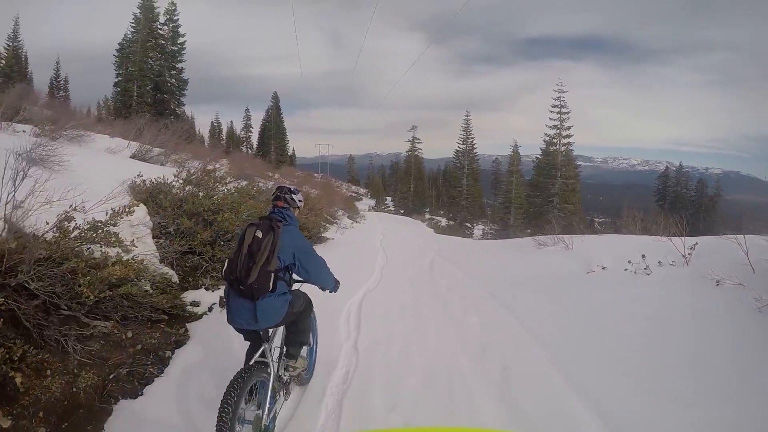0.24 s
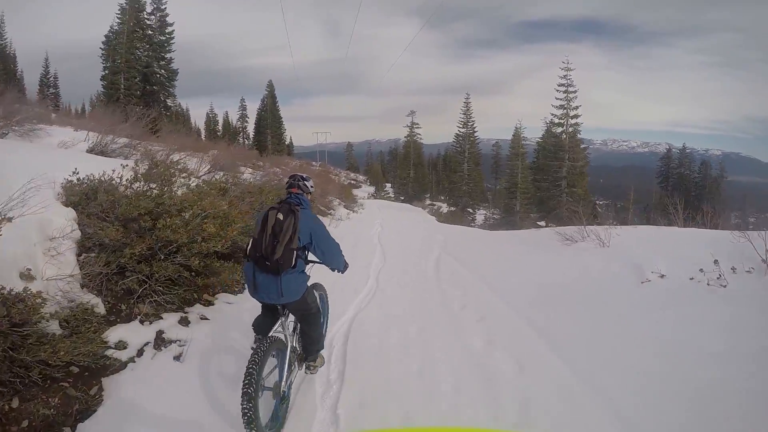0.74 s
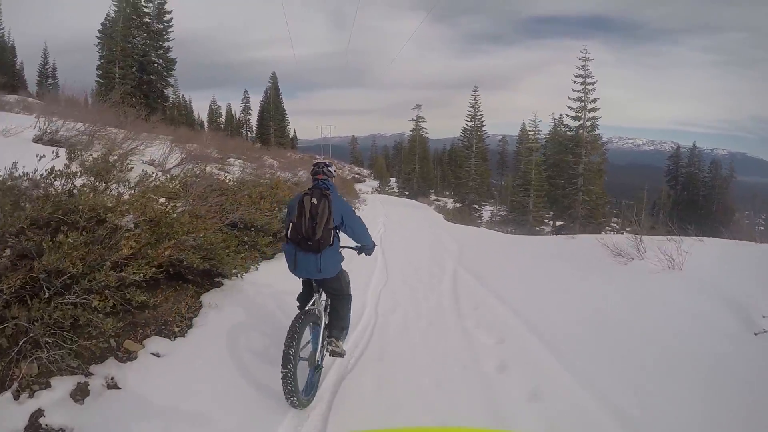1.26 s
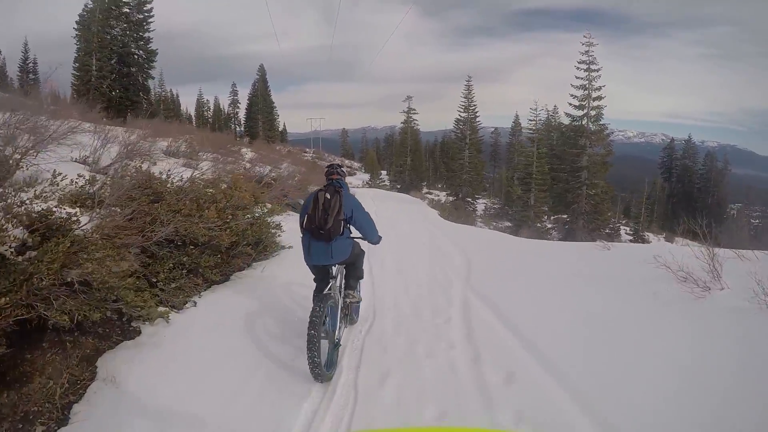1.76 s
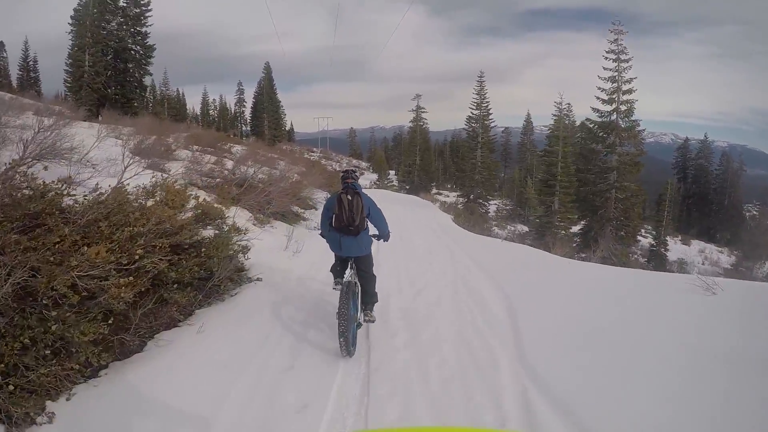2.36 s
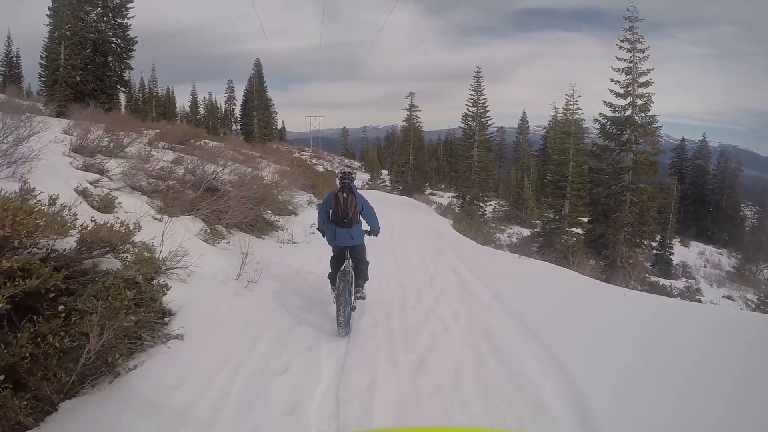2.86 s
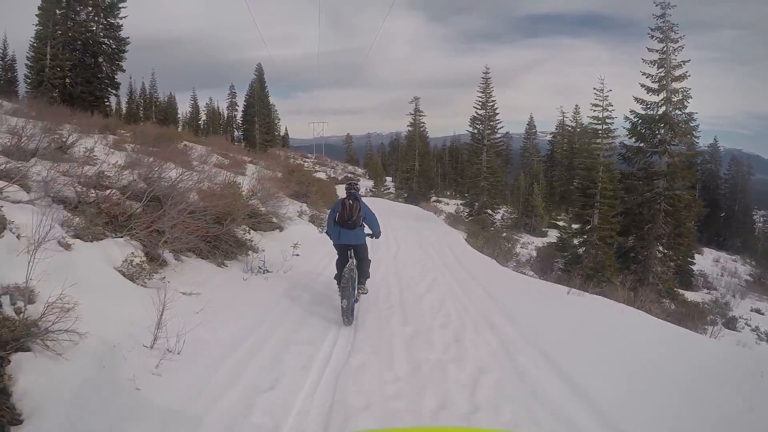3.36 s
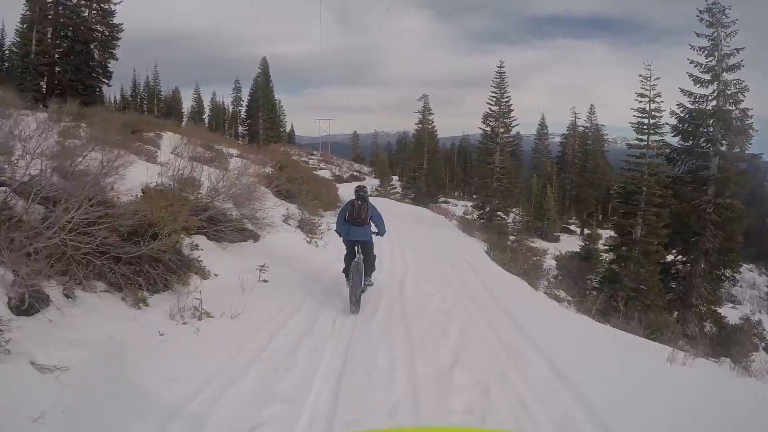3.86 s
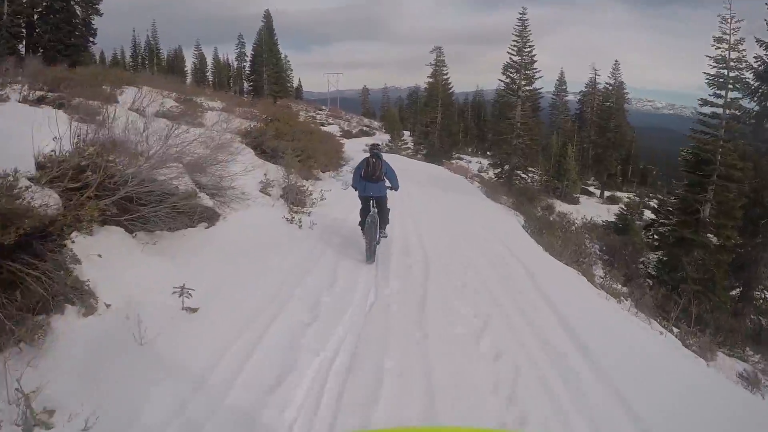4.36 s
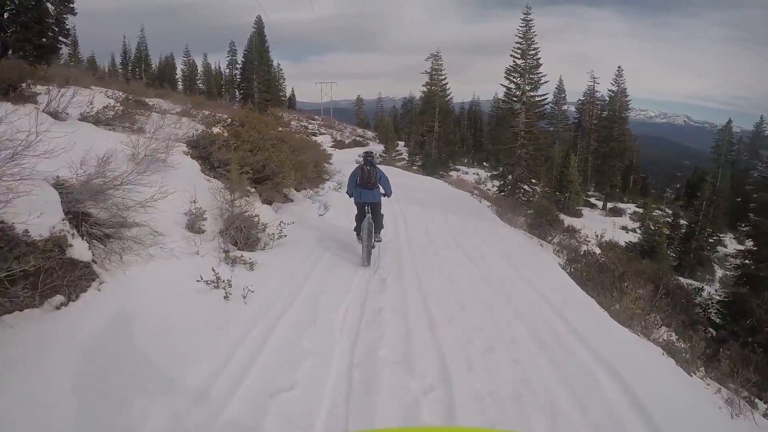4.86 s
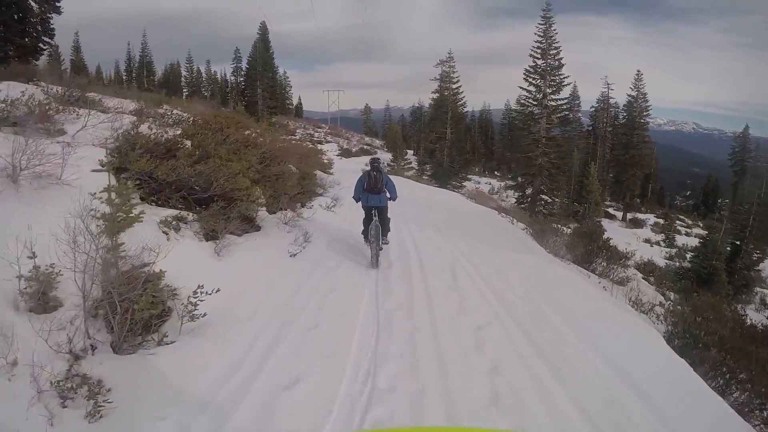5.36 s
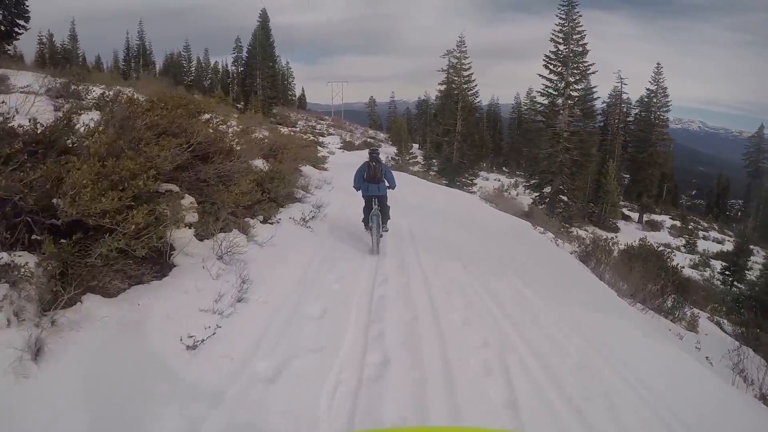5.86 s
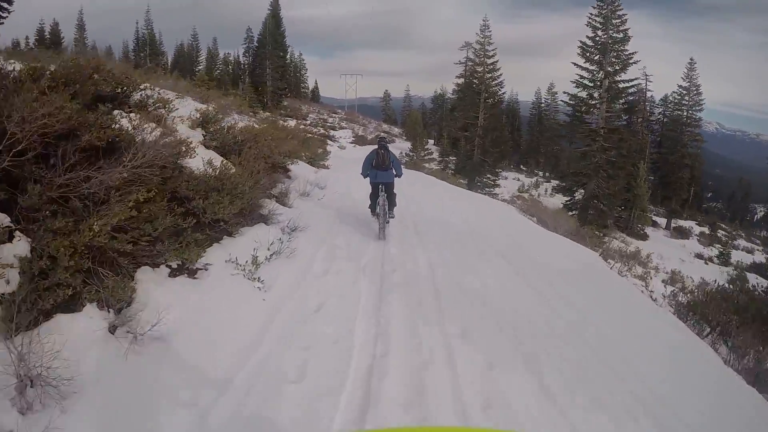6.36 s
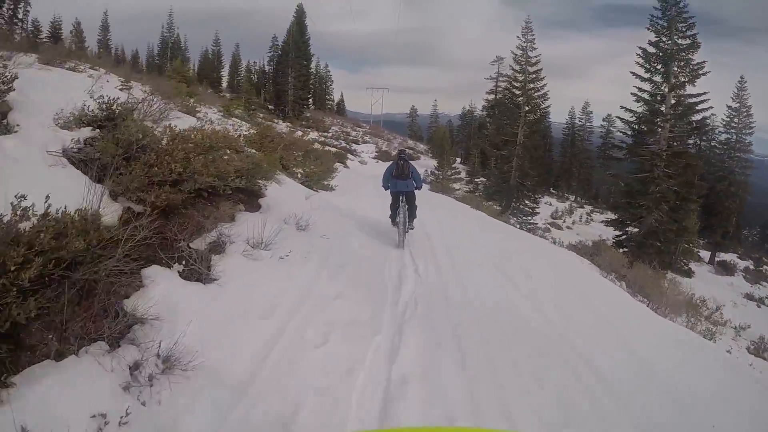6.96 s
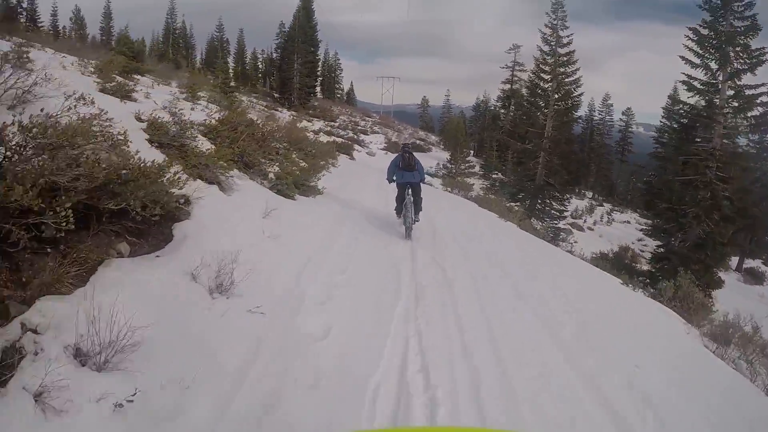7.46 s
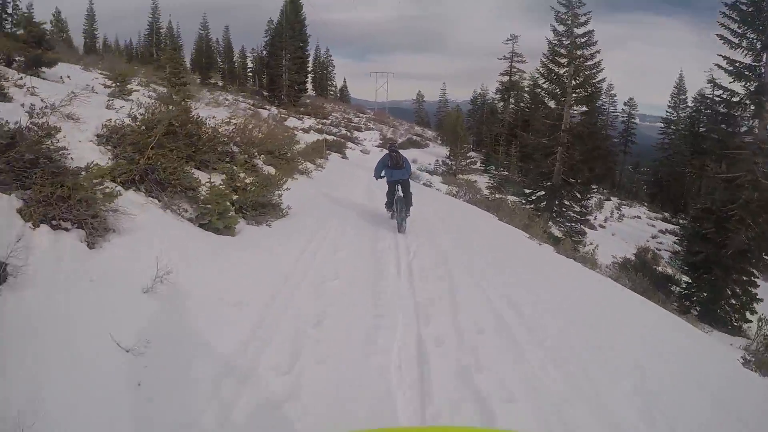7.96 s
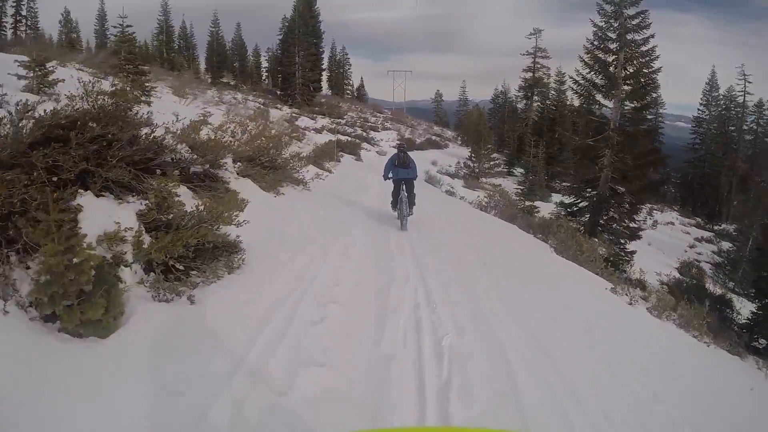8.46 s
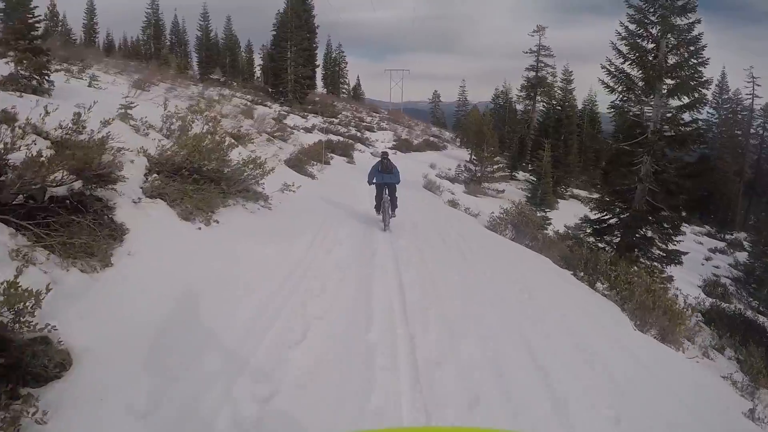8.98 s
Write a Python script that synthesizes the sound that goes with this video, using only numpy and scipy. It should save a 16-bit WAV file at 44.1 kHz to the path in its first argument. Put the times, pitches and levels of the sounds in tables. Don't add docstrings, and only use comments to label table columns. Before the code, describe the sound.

Fat bike tyres crunch and thump over packed snow while low wind buffeting swells into heavy rumble and a plastic camera case knocks and rattles.

```python
import sys
import numpy as np
from scipy import signal
from scipy.fft import rfft, irfft, next_fast_len
from scipy.io import wavfile
from scipy.ndimage import uniform_filter1d

SR = 44100
rng = np.random.default_rng(int(sys.argv[2]) if len(sys.argv) > 2 else 0)


def ratio(d):
    e = np.asarray(d, float) / 20
    return 10 ** e


def pcm_store(signal):
    levels = np.round(np.clip(np.atleast_2d(signal), -1, 1) * 32767)
    wavfile.write(sys.argv[1], SR, levels.astype(np.int16).T)


N = 406602

# (time [s], level [dB])
WIND_PUSH = [(0, -53), (.15, -36.5), (.72, -52.5), (1.0, -44.5), (2.36, -42), (2.5, -40), (2.535, -26.5),
             (3.31, -31.5), (3.9, -18), (4.3, -21), (5.0, -16.5), (6.3, -16.5), (6.8, -19.5), (7.5, -17),
             (8.1, -19), (9.22, -20)]
# (time [s], buffet change [dB], flutter change [dB])
GUST_SWELLS = [(1.2, -11, -10), (1.95, 1, -15), (2.53, -7, -11), (2.63, 8.5, -12), (2.85, 3.5, -39),
               (3.45, -3, 3), (4.39, -9, -3), (4.46, 11, 4), (4.7, 1, -1.5), (5.0, -4.5, -4),
               (5.16, -0.5, -1), (5.28, 2, 2), (5.35, -2, -8.5), (5.44, 3.5, 2.5), (5.53, -5.5, -10.5),
               (5.75, 6, 0.5), (5.86, -3, -5), (6.09, -2, 1.5), (6.45, -5.5, -2.5), (6.8, -13.5, 0),
               (7.7, 6, 1), (7.87, -8.5, -4.5), (7.95, 7, 5.5), (8.09, -5, -1.5), (8.27, 2, -0.5),
               (8.63, 3.5, 1), (8.76, -5.5, -5.5), (8.91, 6, -4.5), (9.14, -4.5, 0.5)]
# (frequency [Hz], density [dB per Hz])
BUFFET_COLOUR = [(8, -41.5), (14, -10.5), (30, 7), (60, 3), (90, -6.5), (130, -19), (200, -56.5)]
# (frequency [Hz], density [dB per Hz])
FLUTTER_COLOUR = [(50, -29.5), (85, -1.5), (140, -4), (200, -8), (300, -17.5), (500, -56.5)]
# (time [s], peak level [dB], pitch [Hz])
EDDY_SLAPS = [(3.555, -12, 69), (3.764, -15, 88.8), (3.85, -15, 104), (3.899, -16, 85.5),
              (3.974, -10, 99.6), (4.136, -14, 78.1), (4.456, -40, 258), (4.456, -7.5, 113),
              (4.555, -21, 61.9), (4.718, -6, 62.4), (5.063, -14, 78.1), (5.117, -11, 87),
              (5.237, -10, 62.4), (5.327, -9, 88.8), (5.432, -17, 64.6), (5.646, -12.5, 61.9),
              (5.923, -11, 79), (6.094, -10.5, 67), (6.264, -8.5, 86.1), (6.379, -15, 108),
              (6.696, -8, 99.6), (6.88, -15, 91.5), (6.948, -11.5, 127), (7.037, -12, 107),
              (7.142, -4.5, 60.4), (7.177, -6, 129), (7.339, -14, 79), (7.584, -20, 88.8),
              (7.651, -16, 61.9), (7.915, -10, 68.6), (8.202, -12.5, 61.9), (8.269, -12, 78.1),
              (8.492, -12, 96.9), (8.807, -8.5, 78.1), (8.881, -13, 91.5), (9.037, -16, 76)]

# (time [s], crunch level [dB], dryness of the snow [dB])
TYRE_BITE = [(0.0, -57.5, -7), (0.38, -50.5, -1), (0.67, -57.5, -5), (1.08, -54, -2), (1.59, -51.5, -4),
             (1.98, -54, -3), (3.29, -54, -2.5), (4.11, -45.5, -3.5), (4.54, -48, -2), (5.24, -42.5, -0.5),
             (5.55, -49.5, -3.5), (6.32, -48.5, -1.5), (6.75, -45.5, -10), (7.27, -42.5, 4),
             (8.14, -51.5, -4), (8.7, -46.5, -3), (8.88, -53, -2.5), (9.22, -50.5, -7)]
# (time [s], change [dB])
CRUST_PATCHES = [(.45, 2.5), (.95, 5), (1.42, 2), (1.62, -2.5), (1.83, 1.5), (2.04, -5.5), (2.13, 0.5),
                 (2.27, -3), (2.38, 4.5), (2.52, -7.5), (3.4, 0.5), (3.7, -1.5), (4.39, -4.5), (4.65, -2),
                 (4.9, 1), (5.7, 0), (6.05, -0.5), (6.28, -3), (6.43, -0.5), (7.05, 0.5), (7.75, 2),
                 (8.2, -1.5), (8.55, 1)]
# (frequency [Hz], density [dB per Hz])
THUD_COLOUR = [(150, -23), (240, -2.5), (330, 0), (450, -2.5), (600, -18), (900, -26)]
# (frequency [Hz], density [dB per Hz])
CRUNCH_COLOUR = [(350, -24), (600, 1.5), (900, -1), (1200, -2), (1500, -6), (1800, -3.5), (2550, -10.5),
                 (3350, -18), (4100, -29.5), (5000, -29), (7000, -50), (9100, -57.5)]
# (frequency [Hz], level [dB], decay to -60 dB [s])
FRAME_MODES = [(158.7, -4, 0.14), (334, -9, 1)]
# (time [s], peak level [dB], pitch [Hz])
RUT_HITS = [(0.058, -30, 323), (0.123, -31, 365), (0.161, -24, 308), (0.225, -29, 325), (0.29, -38, 598),
            (0.29, -19.5, 320), (0.324, -18.5, 220), (0.365, -29, 460), (0.39, -23, 320), (0.457, -27, 331),
            (0.492, -28, 334), (0.516, -28, 237), (0.556, -28.5, 343), (0.715, -40, 420), (0.777, -30, 388),
            (0.825, -36, 320), (0.864, -31, 240), (0.928, -38, 444), (0.952, -31, 307), (1.01, -26.5, 430),
            (1.062, -28.5, 396), (1.215, -41, 326), (1.311, -43, 336), (1.344, -27, 315), (1.415, -25, 323),
            (1.525, -28, 320), (1.55, -23, 277), (1.685, -40, 347), (1.716, -33, 331), (1.754, -29.5, 420),
            (1.78, -26, 218), (1.897, -32, 312), (2.002, -43, 423), (2.084, -45, 404), (2.121, -29, 290),
            (2.205, -39, 350), (2.229, -30, 398), (2.255, -29, 323), (2.321, -36, 280), (2.359, -27, 320),
            (2.415, -35, 350), (2.466, -33, 340), (2.589, -32, 235), (2.624, -32, 326), (2.659, -33, 277),
            (2.698, -32, 288), (2.748, -28, 320), (2.784, -27, 337), (2.821, -26, 328), (2.959, -31, 202),
            (2.999, -40, 234), (3.044, -47, 202), (3.044, -29, 318), (3.097, -33, 374), (3.132, -32, 288),
            (3.199, -38, 202), (3.198, -27.5, 202), (3.306, -44, 355), (3.355, -38, 213),
            (3.41, -26.5, 334)]
# (time [s], peak level [dB], pitch [Hz])
RIDGE_JOLTS = [(0.16, -25, 91.5), (0.324, -29.5, 111), (0.518, -39, 156), (1.358, -33, 104),
               (1.561, -28.5, 77), (1.761, -43, 67.3), (2.136, -34, 130), (2.369, -28.5, 114),
               (3.039, -22, 94), (3.169, -20.5, 82), (3.409, -14, 74.4)]
# (time [s], peak level [dB], pitch [Hz])
CRUST_SNAPS = [(3.405, -31, 743), (3.539, -40, 563), (3.761, -35, 713), (3.857, -45, 587),
               (3.894, -32, 756), (4.121, -31, 630), (4.278, -40, 552), (4.337, -29, 762),
               (4.406, -36, 783), (4.453, -29, 996), (4.706, -34, 999), (4.792, -36, 915),
               (4.956, -37, 552), (4.993, -33, 689), (5.056, -37, 595), (5.171, -27, 856),
               (5.459, -27.5, 581), (5.664, -36, 560), (5.715, -30, 573), (5.95, -43, 552),
               (6.48, -36, 708), (6.546, -32, 608), (6.61, -32, 729), (6.705, -33, 751), (6.862, -32, 689),
               (6.893, -28, 915), (7.21, -30, 573), (7.465, -36, 716), (7.885, -45, 759), (8.264, -32, 589),
               (8.322, -37, 673), (8.368, -41, 630), (8.493, -36, 646), (8.74, -43, 764)]

# (time [s], peak level [dB], upper modes [dB rel], sharp edge [dB rel])
HARD_KNOCKS = [(0.1785, -25.5, -6.5, -24), (0.278, -25, -11, -32), (0.712, -27.5, -8.5, -29),
               (1.1455, -26, -9.5, -22), (1.7172, -28, -3, -51), (2.6408, -22.5, -15, -31),
               (2.8303, -22, -7.5, -20.5), (2.9355, -28, -8, -25), (3.4028, -28.5, -8, -27),
               (3.7506, -22.5, -9, -27), (3.7566, -19.5, -15, -27), (3.8926, -14, -16, -29.5),
               (4.1548, -18.5, -17, -49), (4.2812, -16.5, -21, -55), (4.336, -12, -22, -34),
               (4.3417, -18.5, -7.5, -29), (4.454, -12, -11, -34), (4.7056, -13, -12, -29),
               (5.0178, -15, -9, -23.5), (5.2989, -18.5, -11, -27.5), (5.662, -21.5, -10, -37),
               (5.85, -19.5, -9.5, -26), (6.517, -16.5, -9.5, -25.5), (6.835, -20, -10, -25),
               (7.2623, -18, -9.5, -30), (7.594, -19.5, -8.5, -35), (8.17, -25.5, -6, -23.5),
               (8.416, -15, -13, -23.5), (8.7163, -28.5, -4.5, -22), (8.8383, -19, -9.5, -26)]
# (time [s], peak level [dB], upper modes [dB
# rel], sharp edge [dB rel])
THIN_TICKS = [(.588, -33, -1, -17), (.72, -32, -0.5, -19), (1.224, -52, 7, 0), (1.5614, -37, 1.5, -19),
              (1.951, -46.5, 0.5, -25), (2.126, -41, -15, -29), (2.6813, -39, -4, -14),
              (4.2433, -53, 18, -1), (4.7014, -19.5, -8, -22), (5.306, -20, -8, -26),
              (7.2089, -25.5, 1.5, -15.5), (7.659, -34.5, 5, -7), (7.667, -34.5, 5, -1.5),
              (7.856, -39, -21, -42), (7.9312, -31.5, -5.5, -14), (8.408, -23, -4.5, -19.5)]
# (time [s], peak level [dB], upper modes [dB rel])
GENTLE_RATTLE = [(0.1348, -36, -21), (0.285, -31, -8.5), (0.325, -40, -16), (0.8235, -33.5, -11),
                 (0.8304, -33.5, -15), (1.023, -37, -6), (1.1344, -37.5, -2), (1.355, -32, -14),
                 (1.451, -33.5, -24), (1.5264, -41, -20), (1.7763, -35, -5.5), (2.08, -35, -8),
                 (2.1778, -36, -6.5), (2.184, -35, -23), (2.232, -46, -12), (2.3, -45, -6),
                 (2.361, -35.5, -23), (2.3838, -50, -21), (2.4013, -38, -25), (2.493, -34, -21),
                 (2.5376, -32.5, -7.5), (2.73, -36.5, -8), (2.9311, -32, -9), (3.019, -42, -4),
                 (3.0434, -39, -5), (3.0572, -29, -11), (3.106, -36, -11), (3.142, -38, -18),
                 (3.1476, -45, -23), (3.209, -36.5, -9.5), (3.301, -31, -8), (3.485, -36.5, -6.5),
                 (3.564, -37.5, -14)]
# (time [s], peak level [dB], upper modes [dB rel])
SPEED_RATTLE = [(3.8716, -24, -11), (4.0001, -28, -9.5), (4.121, -31, -17), (4.274, -27, -19),
                (4.31, -38, -8), (4.439, -42, -8), (4.5031, -28.5, -10), (4.5352, -27.5, -9),
                (4.687, -44, -2), (4.754, -31, -10), (4.807, -27.5, -7), (4.8568, -26, -16.5),
                (5.1936, -23, -12), (5.3388, -31, -11), (5.459, -29, -8), (6.003, -38, -9),
                (6.055, -38.5, -9), (6.606, -30, -11.5), (6.7056, -40, -20), (6.7995, -32, -20),
                (6.873, -28, -15), (6.9122, -30.5, -9.5), (7.0714, -28, -9), (7.3258, -23, -12.5),
                (7.4786, -24.5, -12), (7.58, -24, -10), (7.7234, -33, -17), (7.7562, -24.5, -11.5),
                (7.896, -27, -10), (7.991, -28.5, -17), (8.2403, -41, -8), (8.253, -29, -10),
                (8.296, -26.5, -8), (8.324, -38, -10), (8.494, -28.5, -18), (8.885, -33.5, -6)]
# (time [s], peak level [dB])
DEEP_ANSWERS = [(0.161, -41.5), (0.18, -33), (0.2793, -35), (0.3253, -40), (0.5896, -44), (0.7124, -44),
                (0.833, -40), (1.1468, -44), (1.4526, -39), (1.717, -27.5), (2.1844, -40.5), (2.4937, -50),
                (2.6431, -41), (2.833, -31), (2.9372, -35), (3.1487, -37), (3.4055, -31.5), (3.7574, -30),
                (3.8722, -39), (3.8936, -26), (4.002, -34.5), (4.1569, -32), (4.2747, -38), (4.3425, -23),
                (4.4553, -24.5), (4.7052, -18), (4.755, -33), (4.806, -26), (4.8588, -29.5), (5.019, -21),
                (5.0656, -34), (5.1956, -31), (5.3012, -30.5), (5.3403, -32.5), (5.46, -33.5), (5.663, -40),
                (5.8507, -38), (6.5181, -23), (6.605, -30), (6.7038, -36), (6.8356, -28.5), (6.876, -33),
                (7.0203, -41), (7.2108, -27.5), (7.2655, -24), (7.3254, -32), (7.5807, -30), (7.7238, -39),
                (7.7579, -41), (7.8547, -39), (7.8965, -34.5), (7.9907, -33.5), (8.1726, -26.5),
                (8.2427, -43), (8.2546, -28), (8.298, -27.5), (8.4114, -21), (8.7168, -30), (8.8388, -27),
                (8.8872, -34)]
# (frequency [Hz], level [dB], decay to -60 dB [s])
DEEP_MODES = [(783, -18.5, 0.02), (1239, -5, 0.027)]
# (frequency [Hz], level [dB], decay to -60 dB [s])
LOW_MODES = [(1252, -13.5, 0.022), (1710, -6.5, 0.02), (1870, -4, 0.014)]
# (frequency [Hz], level [dB], decay to -60 dB [s])
UPPER_MODES = [(2272, -12, 0.025), (3020, -6, 0.018), (3463, -2.5, 0.015), (4450, -25.5, 0.0096),
               (4890, -12, 0.015), (5440, -15, 0.016), (6130, -25.5, 0.014)]
# (frequency [Hz], level [dB], decay to -60 dB [s])
EDGE_MODES = [(7000, -3.5, 0.0067), (8720, 1, 0.0044), (10260, -1.5, 0.011), (11130, 3, 0.0061),
              (12400, -11, .007), (13300, -6.5, .006), (15000, -3.5, .008)]

# (time [s], half length [s], level [dB])
RUB_STROKES = [(1.16, .03, -71), (1.7, 0.038, -57), (2.684, 0.011, -59), (4.818, 0.018, -54),
               (5.302, 0.12, -65), (5.846, 0.022, -62), (6.908, 0.034, -64), (7.22, 0.054, -71),
               (7.48, 0.012, -63), (7.607, 0.014, -54), (7.664, 0.0049, -44), (7.93, 0.0065, -50),
               (8.258, 0.096, -64)]
# (frequency [Hz], density [dB per Hz])
RUB_HISS = [(2500, 0), (3600, 7), (4200, 7.5), (5400, -3.5), (6600, -4.5), (9000, -11), (10600, -9.5),
            (13000, -15), (15500, -25.5)]
# (time [s], pitch [Hz], level [dB], octave level [dB])
SQUEAK_GLIDE = [
    (7.525, 6580, -94, -100),
    (7.54, 6740, -75, -100),
    (7.558, 6760, -54, -68),
    (7.572, 6400, -55, -86),
    (7.584, 6600, -48, -47),
    (7.598, 6680, -37, -91),
    (7.612, 6770, -50, -97),
    (7.63, 6800, -68, -100),
    (7.645, 6650, -88, -110),
]
# (frequency [Hz], density [dB per Hz])
PREAMP_HISS = [(3500, -26.5), (5500, -5), (6500, -2.5), (13000, -6.5), (15200, -10.5), (15500, -38)]
# (time [s], level [dB])
WHISTLE_LEVEL = [
    (0, -81),
    (3.6, -86),
    (4.5, -86.5),
    (9.22, -84.5),
]


def rms_one(x):
    return x / np.sqrt(np.mean(x ** 2) + 1e-20)


def in_time(rows):
    s, *columns = np.transpose(rows)
    return [np.interp(np.arange(N) / SR, s, column) for column in columns]


def swells(times, heights_db, half_s):
    t = np.arange(0, N + 100, 100) / SR
    bells = np.exp(-.5 * ((t[:, None] - times) / half_s) ** 2)
    return in_time(np.transpose([t, bells @ heights_db]))[0]


def drift(rate):
    r = np.exp(-80 * np.pi * rate / SR)
    slow = signal.lfilter([1], [1, -2 * r, r * r], rng.standard_normal(N // 40 + 2002))[2000:]
    return np.interp(np.arange(N) / 40, np.arange(len(slow)), rms_one(slow))


def ring(x, hz, t60):
    r, w = ratio(-60 / (t60 * SR)), 2 * np.pi * hz / SR
    return signal.lfilter([0, np.sin(w)], [1, -2 * r * np.cos(w), r * r], x + 1e-18)


def colour(x, spectrum):
    hz, db = np.transpose(spectrum)
    size = next_fast_len(N)
    log_hz = np.log(np.arange(size // 2 + 1) * SR / size + 1)
    gain = ratio(np.interp(log_hz, np.log(hz), db, -170, -170))
    return rms_one(irfft(rfft(x, size) * gain, size)[:N])


def grains(per_s, spread_db):
    sizes = ratio(spread_db * np.minimum(rng.exponential(1, N), 5)) * rng.choice([-1, 1], N)
    return rms_one(sizes * (rng.random(N) < per_s / SR))


def pushes(rows, damping, trim_db):
    out, t = np.zeros(N + 4000), np.arange(4000) / SR
    for s, db, hz in rows:
        shape = np.sin(2 * np.pi * hz * t) * t * hz * np.exp(-t * hz * damping)
        out[round(s * SR):][:4000] += ratio(db + trim_db) * shape / np.abs(shape).max()
    return out[:N]


def ride():
    (wind_db,), (bite_db, dry_db) = in_time(WIND_PUSH), in_time(TYRE_BITE)
    s, buffet_db, flap_db = np.transpose(GUST_SWELLS)
    gust_db, flap_db = swells(s, buffet_db, half_s=0.048), swells(s, flap_db, half_s=0.048)
    patch_db = swells(*np.transpose(CRUST_PATCHES), half_s=0.052)
    crunch_db = bite_db + patch_db + 2
    air, bite = wind_db + 19, crunch_db + 47
    flutter_db = -23.5 + 1.37 * air + flap_db
    frame_shake_db = crunch_db + 0.5
    fast_db = 10 * np.log10(ratio(flutter_db) ** 2 + ratio(frame_shake_db) ** 2)
    thud_db = -34 + 0.81 * bite + 0.25 * air
    powder_db = -62 + 0.45 * bite - 0.17 * air + dry_db
    return wind_db + gust_db, fast_db, thud_db, crunch_db, powder_db


def wind(slow_db, fast_db, gust):
    eddies = grains(150.0, spread_db=2.0)
    slow = colour(eddies + .6 * rng.standard_normal(N), BUFFET_COLOUR) * ratio(1.3 * gust)
    fast = colour(eddies + rng.standard_normal(N), FLUTTER_COLOUR)
    fast = fast * ratio(gust + 1.4 * drift(37.0))
    return ratio(slow_db) * rms_one(slow) + ratio(fast_db) * rms_one(fast)


def tyres(thud_db, crunch_db, powder_db, shake):
    clump = drift(28.0) + .6 * shake
    blocks = grains(400.0, spread_db=2.5)
    thud = rms_one(colour(blocks, THUD_COLOUR) * ratio(1.47 * clump))
    frame_db = np.minimum(thud_db, -38)
    frame = sum(ratio(frame_db + db) * rms_one(ring(blocks, hz, t60)) for hz, db, t60 in FRAME_MODES)
    crystals = grains(800.0, spread_db=3.0) * .75 + rng.standard_normal(N)
    crunch = colour(crystals, CRUNCH_COLOUR) * ratio(1.3 * clump + drift(45.0))
    powder = colour(rng.standard_normal(N), [(2500, -8.0), (3300, 0.5), (4000, -9.0), (4750, -2.0),
                                             (5300, -14), (7000, -21), (13000, -34)])
    spray = ratio(powder_db + 2.5 * drift(15.0)) * powder
    return ratio(thud_db) * thud + frame + ratio(crunch_db) * rms_one(crunch) + spray


def electronics():
    hiss = ratio(-76) * colour(rng.standard_normal(N), PREAMP_HISS)
    whistle = rms_one(ring(rng.standard_normal(N), hz=8380, t60=.016)) * ratio(2.5 * drift(20.0))
    return hiss + ratio(in_time(WHISTLE_LEVEL)[0]) * whistle


def ruts():
    return pushes(np.add(RUT_HITS, [0.00198, 0, 0]), damping=3.04, trim_db=2.5)


def strike(modes, times, peak_db, swell_s, scatter_db=2.0, chatter_db=2.0):
    t, out = np.arange(1000) / SR, np.zeros(N + 1000)
    rows = 0
    for hz, level_db, t60 in modes:
        detune, strength, phase = rng.standard_normal((len(times), 3)).T[:, :, None]
        rise_s = swell_s * (modes[-1][0] / hz) ** 1.5
        swell = np.sin(np.pi / 2 * np.minimum(t / rise_s, 1)) ** 2
        fade_db = level_db + scatter_db * strength - 60 * np.maximum(t - rise_s, 0) / t60
        tone = np.sin(2 * np.pi * hz * (1 + 0.013 * detune) * t + 9 * phase)
        rows = rows + tone * ratio(fade_db) * swell
    chatter = rms_one(signal.lfilter([1], [1, -1.8, .81], rng.standard_normal((len(times), 1000))))
    rows = rows * ratio(chatter_db * chatter)
    height = np.sqrt(2 * uniform_filter1d(rows ** 2, size=80).max(axis=1))
    for at, gain, row in zip((times * SR).astype(int), ratio(peak_db) / height, rows):
        out[at:at + 1000] += gain * row
    return out[:N]


def knocks():
    contact_s = 0.0017
    rattle = [(*row, -30) for row in GENTLE_RATTLE] + [(*row, -37) for row in SPEED_RATTLE]
    s, db, upper_db, edge_db = np.transpose(list(HARD_KNOCKS) + list(THIN_TICKS) + rattle)
    edge_db = edge_db - 2.5 * np.clip(-60.5 - db - edge_db, 0, 10)
    deep_s, deep_db = np.transpose(DEEP_ANSWERS)
    low = strike(LOW_MODES, s, db - 1.0, contact_s)
    upper = strike(UPPER_MODES, s, db + upper_db - .6, 0.23 * contact_s)
    edge = strike(EDGE_MODES, s, db + edge_db - .7, 0.086 * contact_s)
    deep = strike(DEEP_MODES, deep_s - 0.001544, deep_db + 2.5, 1.68 * contact_s)
    return low + upper + edge + deep


def jolts():
    return -pushes(RIDGE_JOLTS, damping=3.9, trim_db=4.0)


def mount():
    hz, db, octave_db = in_time(SQUEAK_GLIDE)
    turn = 2 * np.pi * np.cumsum(hz * (1 + 0.0083 * drift(150.0))) / SR
    squeak = ratio(db) * np.sin(turn) + ratio(octave_db) * np.sin(2 * turn)
    squeak = squeak * ratio(-3.0 + 3.5 * drift(90.0))
    t = np.arange(N) / SR
    strokes = sum(ratio(db) * np.exp(-.5 * ((t - s) / half_s) ** 2) for s, half_s, db in RUB_STROKES)
    return squeak + strokes * colour(rng.standard_normal(N), RUB_HISS)


def snaps():
    return pushes(CRUST_SNAPS, damping=1.4, trim_db=1.0)


def slaps():
    return pushes(EDDY_SLAPS, damping=1.66, trim_db=-4.0)


def scene():
    slow_db, fast_db, thud_db, crunch_db, powder_db = ride()
    shake = drift(4.9)
    mix = wind(slow_db, fast_db, shake) + tyres(thud_db, crunch_db, powder_db, shake) + electronics()
    mix = mix + ruts() + knocks() + jolts() + mount() + snaps() + slaps()
    return mix[None, :]


def roll_off(x):
    return signal.sosfilt(signal.butter(12, 16480, fs=SR, output="sos"), x)


def record(dry):
    rounded = 0.9 * np.tanh(dry / 0.9)
    top_cut = signal.cheby1(6, 1, 16300, fs=SR, output="sos")
    ending = np.minimum(np.arange(N)[::-1] / 300, 1)
    return roll_off(signal.sosfilt(top_cut, rounded) * ending)


dry = scene()
out = record(dry)
pcm_store(out)
```